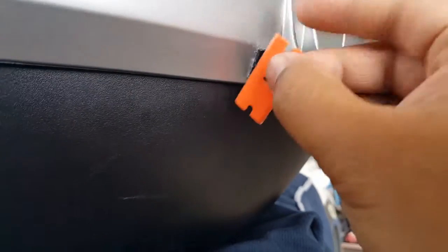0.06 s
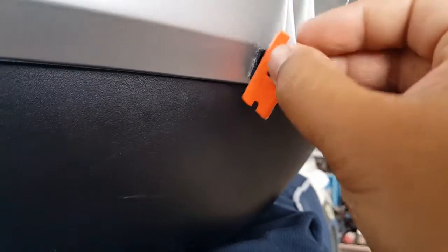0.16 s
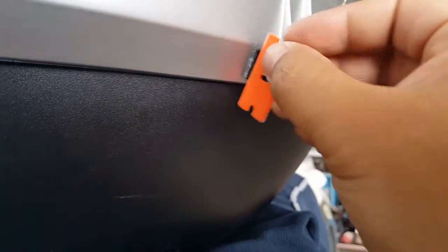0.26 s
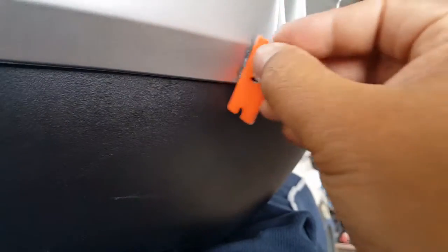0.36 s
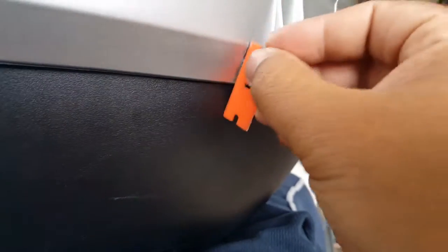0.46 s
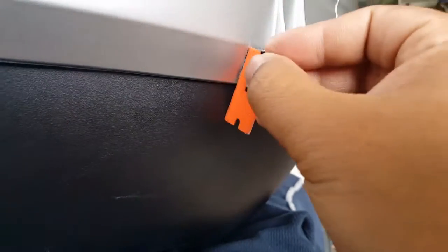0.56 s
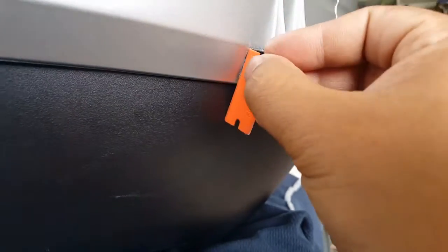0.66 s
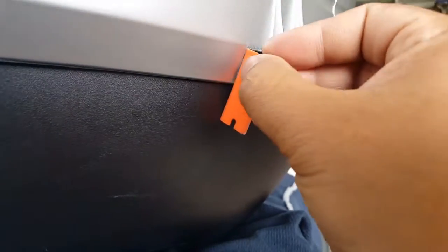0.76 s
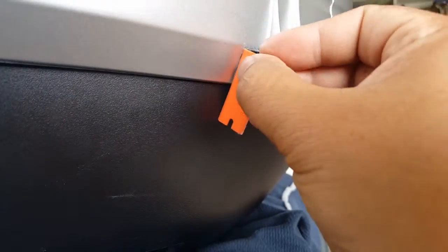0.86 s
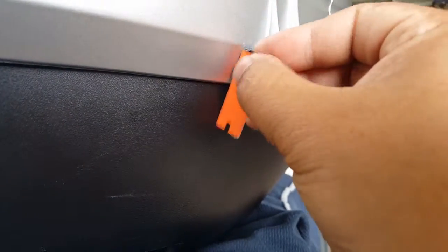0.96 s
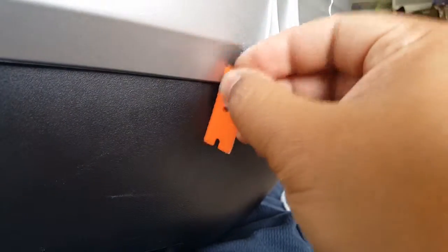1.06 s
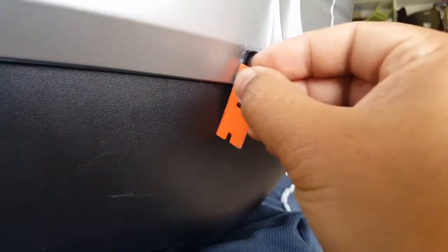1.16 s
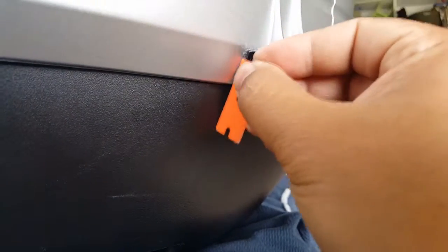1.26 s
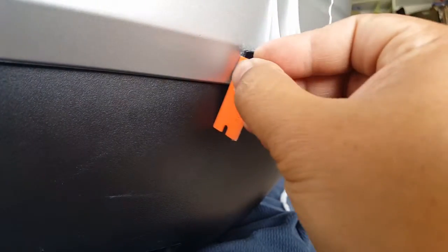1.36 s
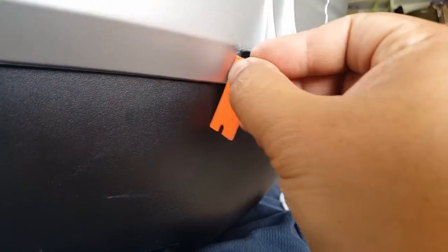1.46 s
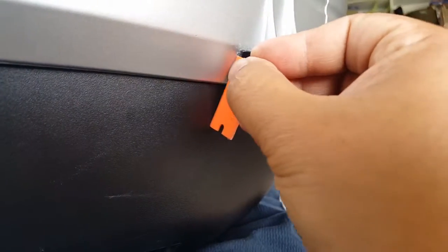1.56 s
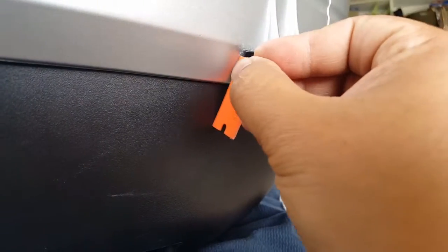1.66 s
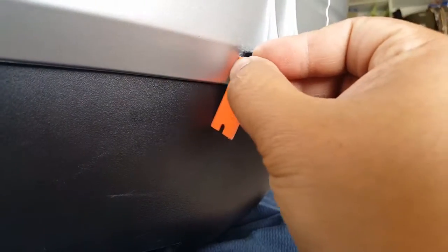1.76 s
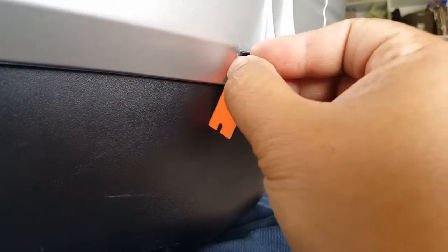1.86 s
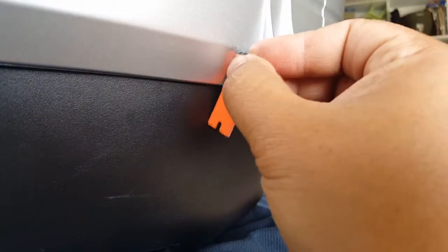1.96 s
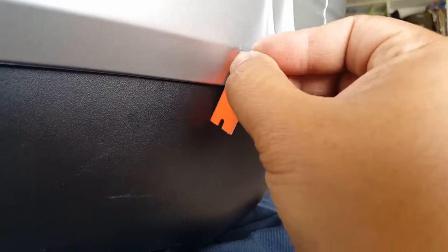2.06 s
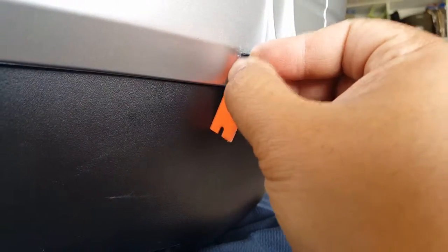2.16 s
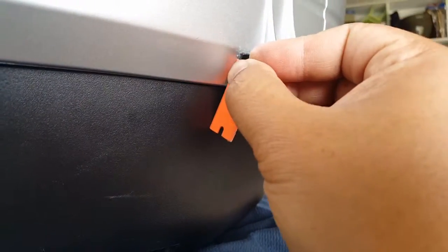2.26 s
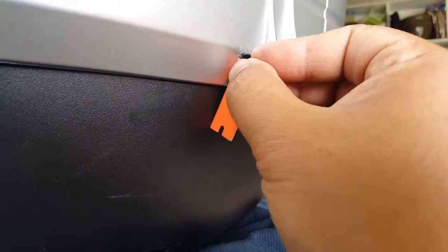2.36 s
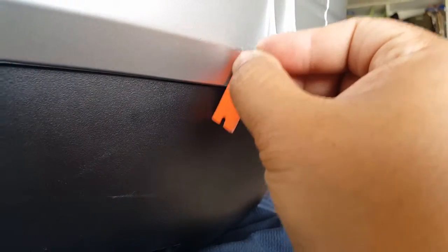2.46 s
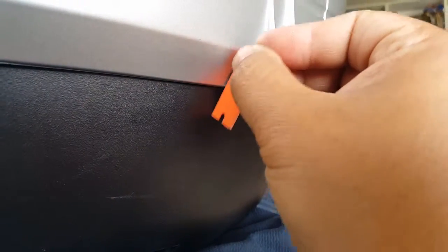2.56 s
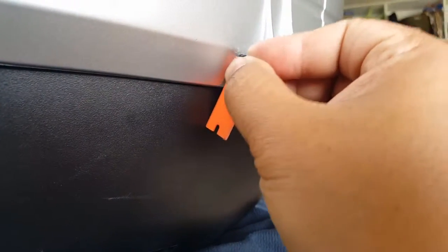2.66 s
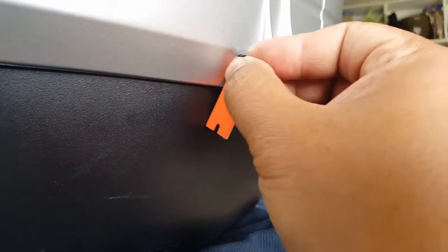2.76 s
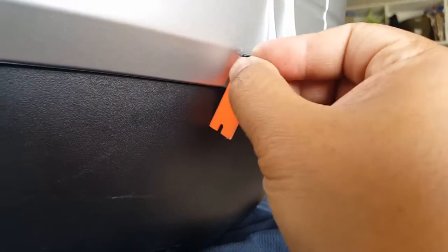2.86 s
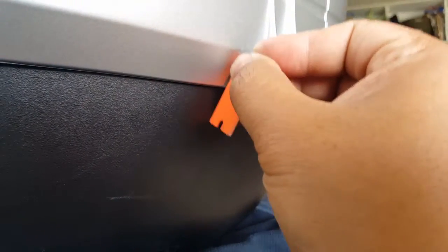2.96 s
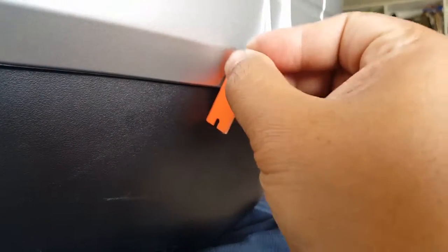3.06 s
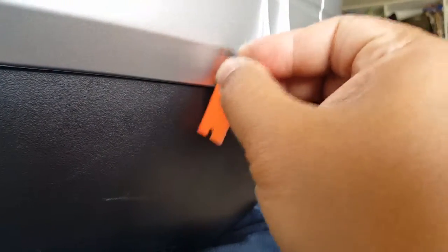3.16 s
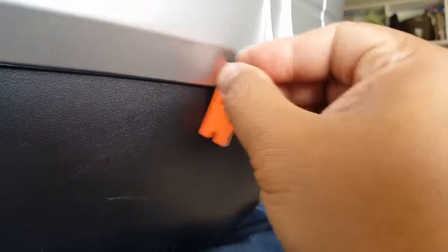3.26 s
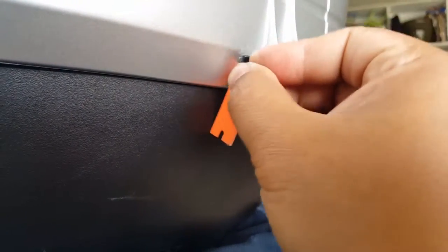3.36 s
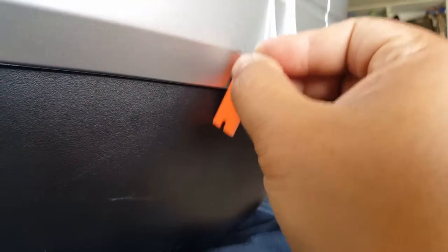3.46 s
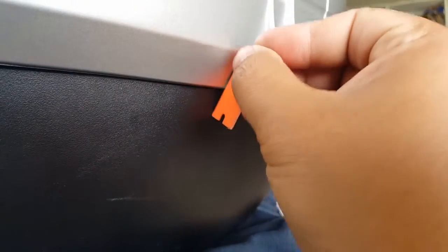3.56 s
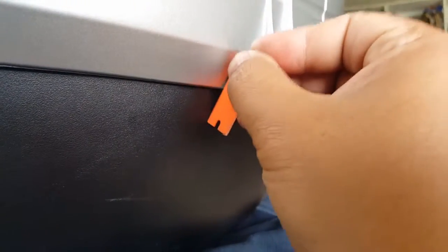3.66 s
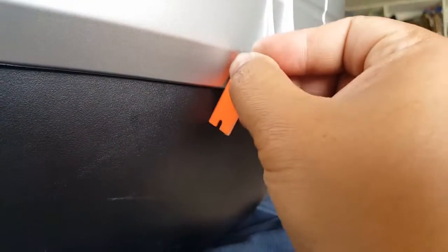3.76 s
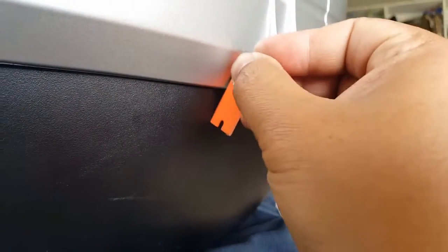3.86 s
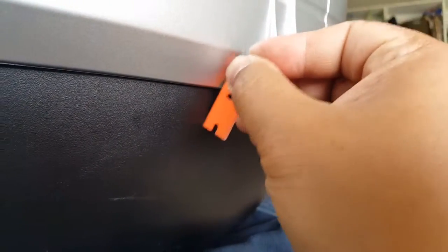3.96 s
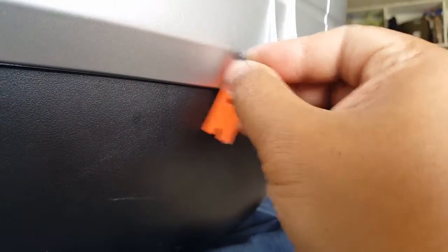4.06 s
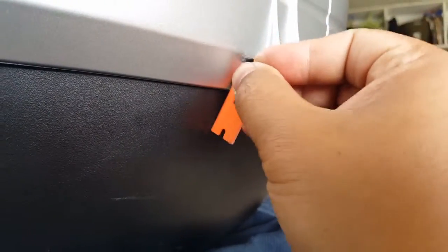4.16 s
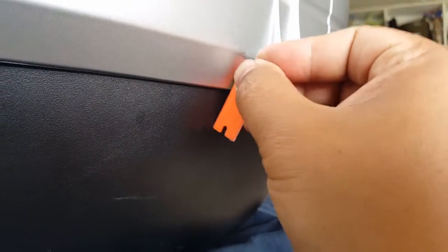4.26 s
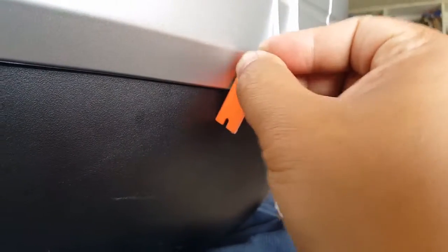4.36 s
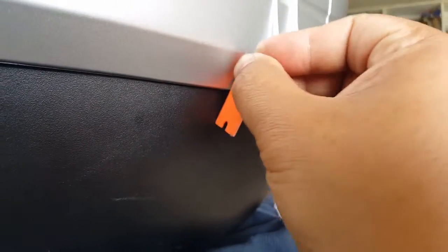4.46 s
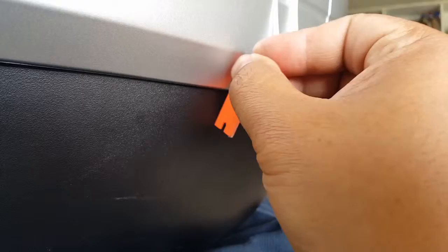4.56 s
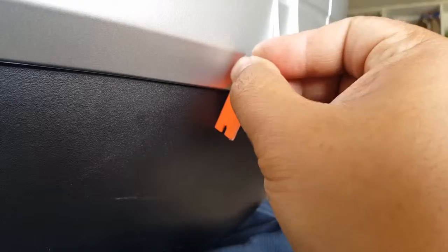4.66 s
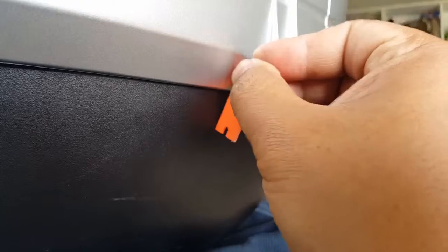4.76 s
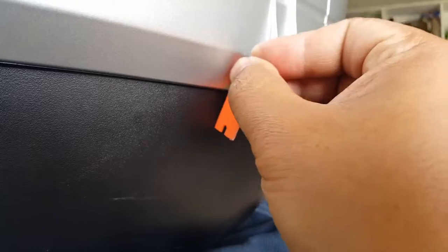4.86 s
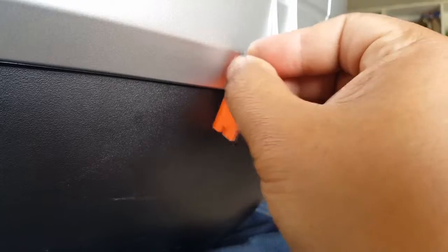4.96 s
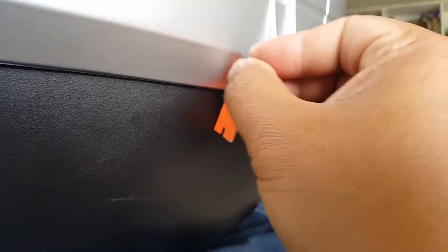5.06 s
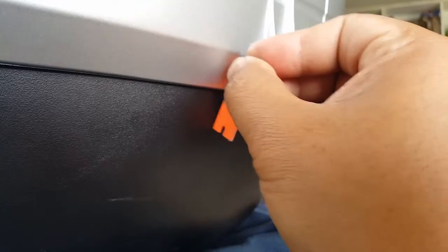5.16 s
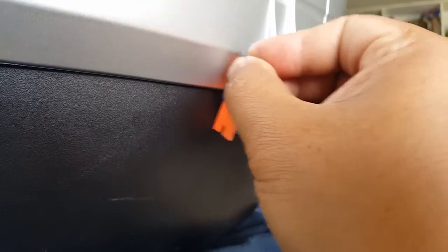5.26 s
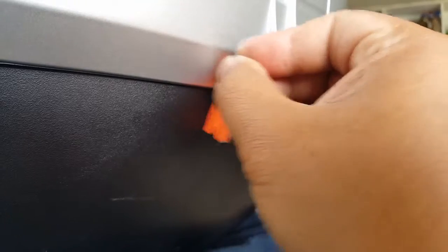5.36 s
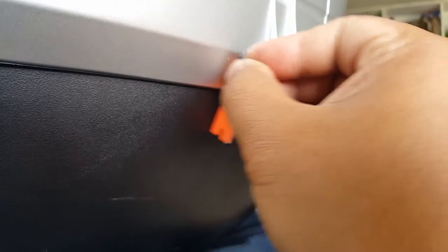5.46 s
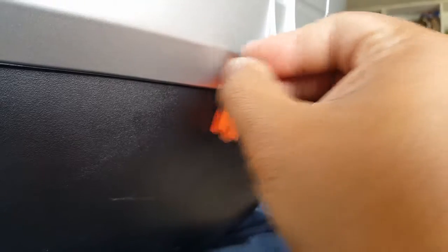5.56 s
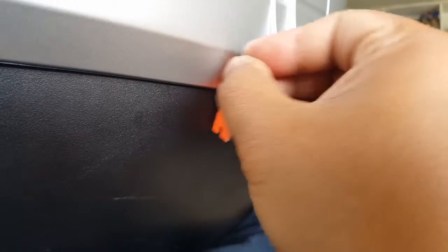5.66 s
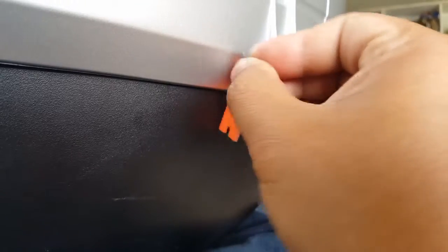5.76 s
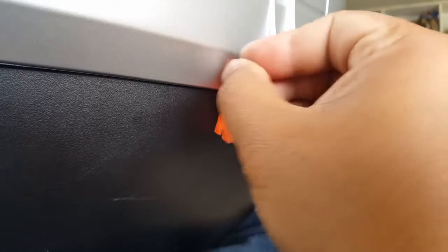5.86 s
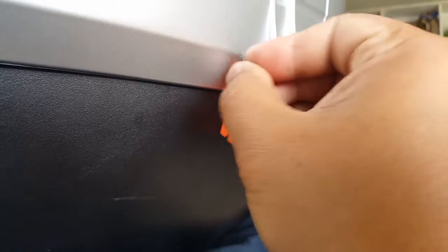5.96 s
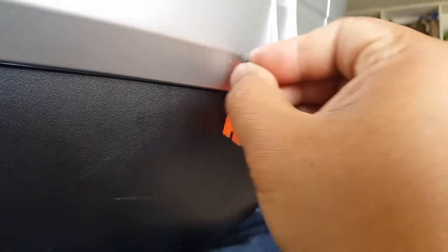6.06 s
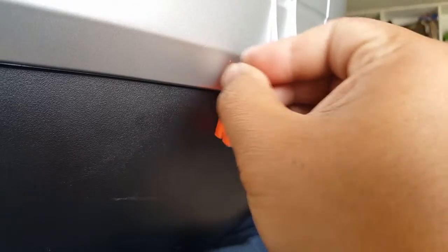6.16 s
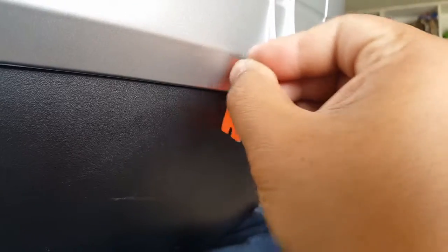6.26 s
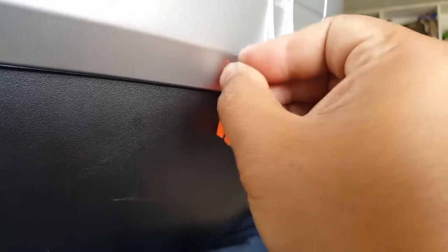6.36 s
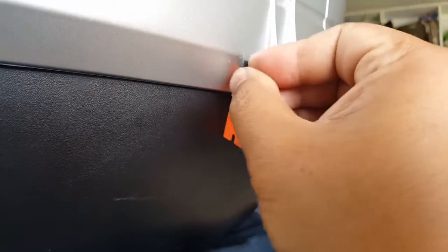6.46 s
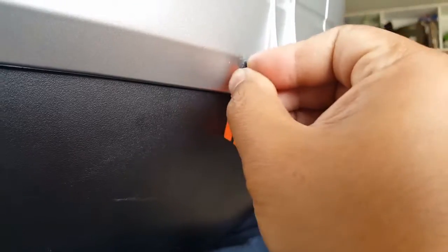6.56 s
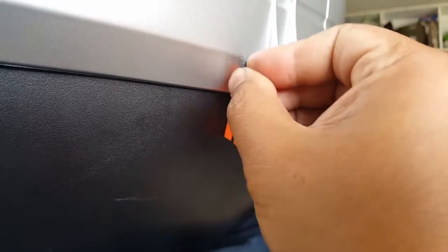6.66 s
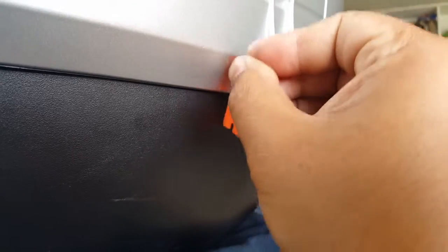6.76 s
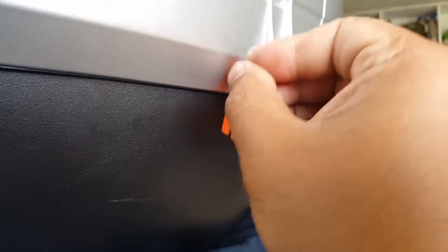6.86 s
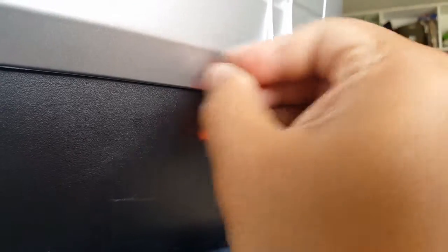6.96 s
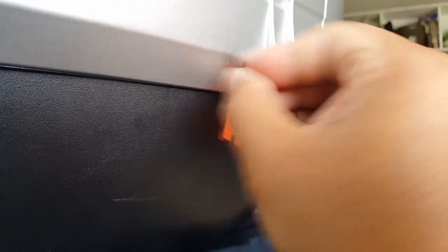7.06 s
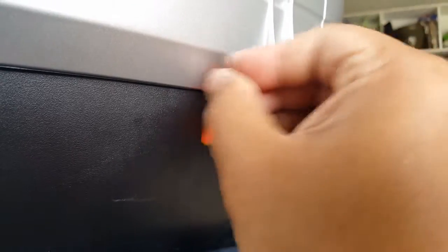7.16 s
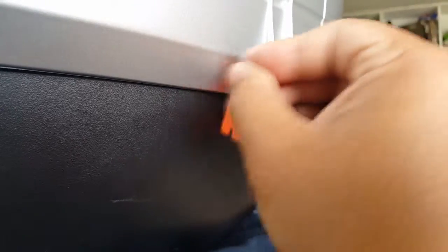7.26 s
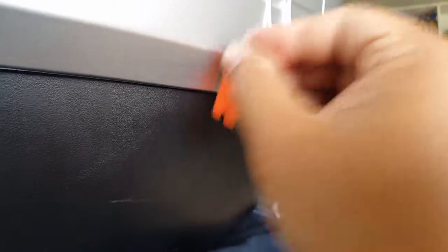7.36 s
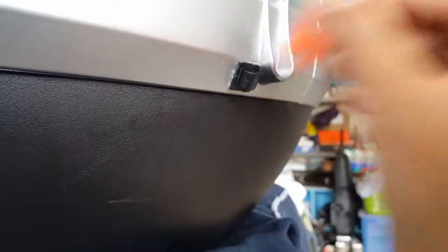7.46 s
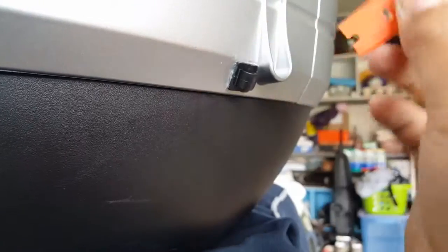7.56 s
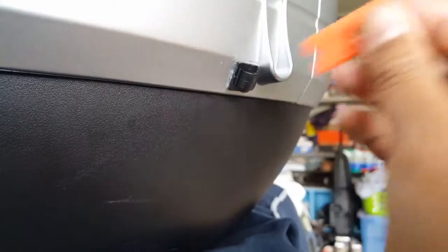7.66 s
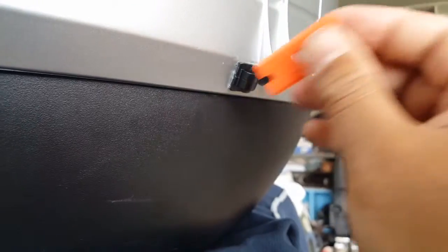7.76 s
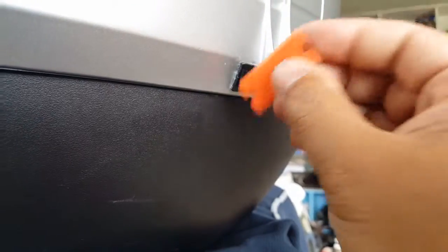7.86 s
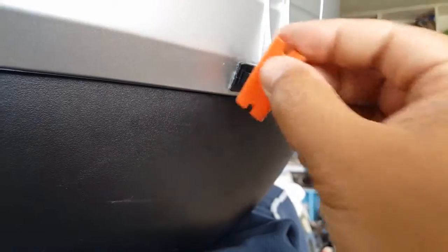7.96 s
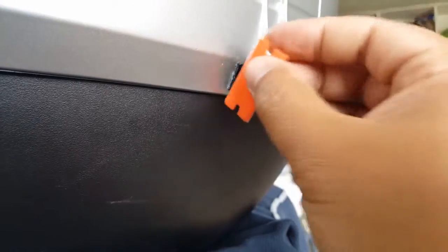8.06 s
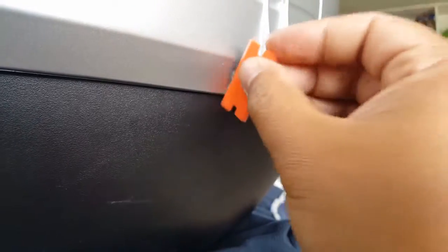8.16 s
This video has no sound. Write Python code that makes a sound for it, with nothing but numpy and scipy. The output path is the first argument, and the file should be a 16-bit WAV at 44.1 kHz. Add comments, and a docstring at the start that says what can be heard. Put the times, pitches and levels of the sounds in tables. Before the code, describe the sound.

Close dry scraping: a small plastic blade ticks and rasps on a hollow plastic case, quickening into loud hollow snaps, then soft finger bumps.

```python
"""In a quiet workshop, a small plastic scraper works dried glue off the edge of a hollow plastic case.
The blade drags, sticks and slips in short strokes and single snaps, close to the microphones.
Each slip is a tiny push sent through the ringing modes of the case; at some releases the panel rings on.
Shaped noise makes the soft rubs of blade and fingers, and short low pulses make the finger bumps.
A low drifting hum of sine waves and steady air noise lie underneath, and the room answers weakly."""
import sys
import numpy as np
from scipy import signal
from scipy.fft import rfft, irfft, next_fast_len
from scipy.io import wavfile
from scipy.ndimage import map_coordinates

SR = 44100
rng = np.random.default_rng(int(sys.argv[2]) if len(sys.argv) > 2 else 0)


def file_out(sig):
    """Save sig as 16-bit WAV at sys.argv[1]."""
    # one column per channel
    cols = np.atleast_2d(sig).T
    # limit, then scale
    lim = np.clip(cols, -1, 1)
    pcm = np.round(lim * 32767).astype(np.int16)
    wavfile.write(sys.argv[1], SR, pcm)


N = 361619

# Pushes of the blade. Each row: start in seconds, end in seconds, place of the hardest push (0-1),
# knock level in dB, then three levels relative to the knock: edge in dB, crispness in dB, thump in dB.
STROKES = [(1.12, 1.171, 0.73, -40, 1, -19.5, -7.5), (1.214, 1.261, 0.82, -39.5, 1, -13.5, -6),
           (1.38, 1.401, 0.2, -47.5, -14, -29, -1.5), (2.052, 2.061, 0.5, -40, -21, -35, -4),
           (2.081, 2.091, 0.77, -42, -8, -22, 0), (2.242, 2.281, 0.38, -46.5, -2.5, -18, -2),
           (3.379, 3.424, 0.56, -38, 1, -4.5, -6.5), (4.176, 4.207, 0.6, -37, 3.5, -7, -5),
           (4.988, 5.007, 0.7, -37, -2.5, -24, -2), (5.053, 5.093, 0.35, -40, -1.5, -20, 1.5),
           (5.365, 5.411, 0.32, -35.5, 2, -16, -7), (5.454, 5.493, 0.65, -29.5, 1, -12, -24),
           (5.565, 5.605, 0, -36, -1.5, -13, -6.5), (5.638, 5.665, 0.44, -33.5, 3.5, -19, -4.5),
           (5.668, 5.706, .6, -44, -1.5, -35, -5), (5.739, 5.771, 0.4, -37.5, -3.5, -14.5, -7),
           (5.808, 5.835, 0.64, -36, 0.5, -20, -8), (5.887, 5.934, 0.43, -45, -5.5, -29, 1),
           (5.963, 5.976, 0.6, -35, 0, -22, -2.5), (6.245, 6.27, 0, -31, 0, -11, -10),
           (6.311, 6.335, 0.86, -36, 1, -22, -19), (6.432, 6.452, 0.1, -39.5, 0, -18, -9),
           (6.486, 6.511, 0.75, -37.5, 6, -15, -10), (7.029, 7.09, 0.6, -31.5, -0.5, -10, -35),
           (7.116, 7.134, .8, -28, 0, -18.5, -26), (7.134, 7.173, 0.7, -27, 3.5, -13.5, -35),
           (7.225, 7.284, 0.41, -34, 0.5, -10, -27), (7.315, 7.367, 0.31, -33, 5.5, -14, -31),
           (7.412, 7.425, 0.06, -29.5, 0, -6.5, -0.5)]
# Single snaps of the blade. Each row: start in seconds, knock level in dB,
# then relative to the knock: edge in dB, crispness in dB.
SNAPS = [(0.41,-57.5,-2,-24), (0.543,-56.5,-5,-28), (0.585,-53,-21,-32), (0.869,-51.5,-21,-28.5),
         (1.123,-48,1,-17), (1.139,-43,8,-20), (1.166,-42,-7,-25), (1.179,-45,-8,-21), (1.239,-46,10,-17),
         (1.263,-48.5,4.5,-2), (1.309,-46,-3,-25), (1.471,-52.5,-16,-23), (1.508,-55,-19,-25),
         (1.595,-42,-12,-21.5), (1.804,-47,-16,-27), (1.918,-55,-12,-16), (2.2163,-47,-3,-11),
         (2.2563,-47,2,-15), (2.5036,-45,2.5,-14.5), (2.538,-43.5,-17,-28.5), (3.2247,-46.5,-9,-19),
         (3.238,-45,8,-8), (3.25,-42,6,-12), (3.2657,-39.5,6,-17), (3.275,-39,2,-18), (3.2889,-38,3,-14),
         (3.303,-44.5,1.5,-13), (3.376,-39.5,-4,-19), (3.399,-38,-2,-16), (3.4629,-41,4.5,-13),
         (4.0256,-41,-2,-27), (4.045,-40.5,5.5,-18), (4.0634,-39,4.5,-11), (4.092,-47,2,-27),
         (4.135,-41,-8,-31), (4.351,-45.5,-3.5,-24), (4.4918,-45,-4.5,-36), (4.672,-46,-1,-19),
         (4.6943,-47,1,-23), (4.755,-50,-4,-29), (4.814,-47,-21,-29), (4.8261,-42,8.5,-5),
         (4.8438,-43.5,6.5,-6), (4.9482,-47,-6,-17), (5.0009,-41.5,5.5,-9), (5.0053,-33.5,1,-14),
         (5.011,-34.5,6,-8.5), (5.024,-38,-18,-38), (5.058,-39.5,4.5,-18), (5.064,-39,6,-13),
         (5.149,-49.5,-6,-23), (5.182,-40.5,0.5,-8), (5.2546,-42,0,-26), (5.323,-53.5,-5,-30),
         (5.371,-42,-4,-9), (5.3797,-43,4,0.5), (5.4015,-42,10,4), (5.4082,-39,7,-11),
         (5.4193,-37.5,1.5,-16), (5.448,-35,0,-17), (5.4596,-39,9,-4), (5.473,-35.5,8,-9),
         (5.527,-54,6,-13), (5.556,-39,3.5,-8.5), (5.648,-42.5,13,0), (5.7226,-46,1,-27),
         (5.8142,-35.5,6,-16), (5.827,-36.5,1.5,-17), (5.852,-53,7,-19), (5.9223,-46,-3,-25.5),
         (6.037,-49.5,-3.5,-28.5), (6.0765,-43.5,-14,-29), (6.085,-47,2,-21), (6.129,-33.5,-5,-32),
         (6.134,-39.5,-9.5,-27), (6.2275,-46,-10,-25), (6.237,-37,-6,-21), (6.3896,-48,7,-32),
         (6.4326,-43,-1,-26), (6.4954,-37,9.5,-9.5), (6.816,-48,-1,-19), (6.8627,-45,1,-29),
         (6.8772,-23.5,3.5,-13.5), (7.0211,-33,-21,-44), (7.0299,-37,4,-6), (7.0764,-39.5,5,-3),
         (7.14,-36,9.5,-3), (7.1473,-36,11,-7), (7.2315,-31.5,-2,-23), (7.2404,-36.5,11,-3.5),
         (7.2465,-46,5,-3), (7.2803,-40.5,7.5,-2), (7.3178,-35,0.5,-22), (7.4065,-33,-4,-24),
         (7.413,-33.5,4,-11), (7.4308,-43,4,-1)]
# The panel springs back as the blade lets go, ringing the modes near one pitch.
# Each row: start in seconds, peak level in dB, pitch in Hz.
PANEL_KNOCKS = [(1.156, -32, 255), (1.241, -38, 255), (1.272, -34, 380), (2.503, -36.5, 776),
                (4.184, -37.5, 145), (4.992, -31.5, 377), (5.002, -35, 292), (5.019, -39, 145),
                (5.081, -38, 145), (5.459, -26, 380), (5.487, -27, 145), (5.562, -28, 776),
                (5.574, -28, 380), (5.671, -36, 145), (5.82, -30, 341), (6.131, -51, 303),
                (6.265, -27, 380), (6.322, -32, 380), (6.879, -18, 776), (7.073, -26, 577),
                (7.113, -23.5, 633), (7.174, -33, 145), (7.411, -23.5, 310), (7.44, -39, 380)]
# Ringing modes of the case. Each row: frequency in Hz, width in Hz, level in dB, left over right in dB.
CASE_MODES = [(140, 29.4, 12, 7), (255, 280, -6, -1.5), (312, 87, 2, 2), (386.7, 36.6, 6.5, 5.5),
              (577, 52, 3.5, 3.5), (679, 48, -30, 17), (776, 52, -3.5, 26), (1028, 59, 5, 6.5),
              (1199, 63, -2.5, 7), (1398, 54, 3, 0.5), (1560, 15, -16, 7), (1755, 53, 10, 7),
              (2240, 60, 10, 0.5), (2693, 59, -1.5, 7), (3020, 135, -5, 8), (3430, 23, -6.5, 5.5),
              (4330, 370, -24.5, 13), (4936, 150, -19.5, 2), (8540, 120, -31, 14)]
# Colour of the panel's crowd of short-lived modes. Each row: frequency in Hz, level in dB.
PANEL_COLOUR = [(60, -17), (140, 2.5), (330, -4), (470, -12), (650, 3), (1300, -2), (2300, 1.5), (2950, 2),
                (3700, -17), (4800, -16), (6500, -20), (8600, -15), (9800, -33), (12300, -27),
                (15500, -40.5)]
# How long that crowd takes to fall by 60 dB. Each row: frequency in Hz, time in seconds.
PANEL_T60 = [(150, 0.23), (800, 0.052), (2500, 0.032), (5000, 0.034), (12000, 0.037)]
# How far the left microphone leads the right. Each row: frequency in Hz, phase in radians.
LEFT_LEAD = [(100, .1), (300, .3), (450, 1.2), (950, 1.0), (1450, 3.1), (2200, 2.2), (3000, 3.1),
             (4300, 4.0), (8000, 7.2), (15000, 12.0)]
# How much louder the panel is on the left. Each row: frequency in Hz, left over right in dB.
LEFT_LOUDER = [(100, 10), (400, 2.5), (750, 10), (1400, -2), (2300, 13.5), (4400, 11), (8000, 12),
               (15000, 7)]
# Soft rubs of blade and fingertips, before panning.
# Each row: middle in seconds, half length in seconds, level in dB, hiss relative to it in dB.
RUBS = [(.5, 0.47, -61, -14.5), (.49, 0.035, -66.5, -32), (.59, 0.02, -68, -19), (.75, 0.046, -69, -22),
        (1.08, 0.019, -59, -22), (1.24, 0.091, -51, -20), (2.43, 0.032, -79, -25), (2.15, 0.028, -63, -26),
        (2.57, 0.052, -50, -26), (2.742, 0.031, -49, -12), (2.883, 0.071, -60.5, -13),
        (3.064, 0.015, -51, -31), (3.57, 0.041, -46.5, -23), (3.77, 0.024, -58, -33),
        (4.117, 0.11, -50.5, -23), (4.42, 0.05, -55, -37), (5.75, 0.025, -47.5, -35),
        (5.86, .012, -71, -21), (5.95, 0.1, -52, -24), (6.17, 0.02, -57, -22), (6.37, 0.057, -54, -16.5),
        (6.47, 0.014, -50, -34), (6.56, 0.022, -55, -22), (6.87, 0.088, -52.5, -34),
        (7.927, 0.084, -62, -12)]
# Colour of the dull rubbing. Each row: frequency in Hz, level in dB.
RUB_COLOUR = [(100, 7), (350, 11.5), (900, 8.5), (1600, -3), (2400, -15), (4000, -17.5), (12000, -94)]
# Shifts of the grip, before panning. Each row: middle in seconds, half length in seconds, rumble in dB.
GRIP_SHIFTS = [(6.254, 0.045, -45), (7.884, 0.048, -48.5), (8.103, 0.09, -40)]
# Colour of the grip's rumble. Each row: frequency in Hz, level in dB.
HANDLING_COLOUR = [(15, -24), (40, 6), (100, 8.5), (200, 7.5), (400, -10), (800, -48), (2000, -72.5)]
# Finger bumps, before filtering and panning. Each row: start in seconds, peak level in dB.
BUMPS = [(6.203, -36), (6.229, -42), (6.254, -29), (6.282, -37), (6.312, -43), (7.708, -62), (7.757, -34),
         (7.812, -34.5), (7.877, -41), (7.911, -34), (7.943, -34.5), (7.982, -34), (7.997, -33),
         (8.03, -28), (8.051, -33), (8.066, -31), (8.092, -22.5), (8.126, -26), (8.152, -26), (8.184, -32)]
# Colour of the air noise. Each row: frequency in Hz, level in dB.
AIR_COLOUR = [(20, -28), (45, -27), (78, -2), (150, -1), (200, -4), (280, -8.5), (450, -15.5),
              (1000, -19.5), (2000, -27), (4000, -34.5), (8000, -40), (10500, -44.5), (13000, -39),
              (15500, -46)]
# Lines of the hum. Each row: ratio to the hum's base pitch, relative level in dB.
HUM_LINES = [(0.533, -5.5), (0.83, -6.5), (0.999, 1), (1.345, -9), (1.619, -6.5), (2, -13.5)]
# Slow drift of the hum's base pitch. Each row: time in seconds, pitch in Hz.
HUM_PITCH = [(0, 101.5), (.8, 100.4), (1.4, 98.3), (1.8, 94.9), (2.2, 94.7), (2.5, 98.2), (3.3, 97.5),
             (4.5, 100.6), (5.8, 103.3), (8.2, 98.5)]
# How long the room's echo takes to fall by 60 dB. Each row: frequency in Hz, time in seconds.
ROOM_T60 = [(150, 0.57), (1000, 0.13), (4000, 0.25), (12000, 0.11)]

SIZE = 16384  # samples in one contact sound
HZ = np.fft.rfftfreq(SIZE, 1 / SR)
TIME = np.arange(N) / SR
TOP_HZ = 15100  # nothing is kept above this
THUMP_HZ, EDGE_HZ, CRISP_HZ = 250, 1200, 4000  # borders between thump, knock, edge and crispness
SLIP_HZ, SLIP_DOUBLING_DB = 184.6, 20  # slips a second at 0 dB of edge; this much more edge doubles it
SNAP_THUMP_DB = -10.5  # relative to the snap's knock
CRACK_TOP_HZ, CRACK_OCTAVE_DB = 19300, 25  # the top falls an octave with this much less crispness
KNOCK_SPREAD_OCT, KNOCK_RISE_S = 0.14, 0.0032
# The fingers rub along with each stroke: level below it, half length over its length, hiss over the rub.
DRAG_DB, DRAG_SPREAD, DRAG_HISS_DB = -19.5, 0.65, -10
# A bump knocks the case dully: knock relative to the bump, then the rest relative to that knock.
BUMP_KNOCK_DB, BUMP_EDGE_DB, BUMP_CRISP_DB, BUMP_THUMP_DB = -26, -20, -47, 4
HUM_DB, HUM_FADE_DB_PER_S = -53.5, 0.86  # level at the start; the hum slowly fades
HUM_SWELL_S, HUM_SWELL_HALF_S, HUM_SWELL_DB = 2.77, 0.11, 5.5  # and swells once
# A higher line comes and goes: ratio to the base pitch, middle, half length, relative level.
HUM_GUEST_RATIO, HUM_GUEST_S, HUM_GUEST_HALF_S, HUM_GUEST_DB = 1.36, 2.3, .55, -3


def strokes(uneven=.36, size_db=1.7, ends_db=-8.0, grit_db=-5, grit_life=0.00094, crumb_rate=2500,
            drag_db=-6, drag_hz=1200, drag_ends_db=0.5, run_up=.009, crackle_db=-11,
            crackle_hz=1800, crackle_spread_oct=0.71, bite=0.23):
    """The blade drags, sticks and slips unevenly; slips crumble glue, most where the push is hardest."""
    track = np.zeros((2, N))
    t = np.arange(SIZE) / SR
    crumble = np.exp(-t / grit_life)
    for start, end, hardest, db, edge_db, crisp_db, thump_db in STROKES:
        length = max(end - start, .005)
        rate = SLIP_HZ * 2 ** (edge_db / SLIP_DOUBLING_DB)
        # slack is how far the push is from its hardest
        peak_s = length * np.clip(hardest, .1, .9)
        knots = run_up + np.array([-run_up, 0, peak_s, length, length + run_up])
        slack = np.interp(t, knots, [0, 1, 0.078, 0.8, 3.9])
        push = amp(ends_db * slack)

        # each slip has its own wait, size and tip pitch; at least one slip is kept
        gaps, sizes, tips = np.clip(rng.standard_normal((3, 40)), -2, 2)
        waits = np.exp(uneven * gaps) / rate
        times = np.cumsum(waits) - waits[0] / 2
        keep = (times < length) | (times == times[0])
        at = ((run_up + times[keep]) * SR).astype(int)
        slips = push * np.bincount(at, amp(size_db * sizes)[keep], SIZE)

        crumbs = rng.standard_normal(SIZE) * (rng.random(SIZE) < crumb_rate / SR)
        crumbling = signal.fftconvolve(slips, crumble)[:SIZE]
        grit = amp(grit_db) * unit(crumbling * crumbs)

        pitches = crackle_hz * 2 ** (crackle_spread_oct * tips[keep])
        crackle = amp(crackle_db) * crackles(at / SR, slips[at], pitches)

        # soft glue yields without a crack
        scrape = band(rng.standard_normal(SIZE), drag_hz, "low", order=2)
        drag = unit(amp(drag_ends_db * slack) * (t < knots[-1]) * scrape)
        drag = amp(drag_db) * drag * np.sqrt(2 * drag_hz / SR)

        force = unit(slips) + grit + crackle + drag
        crack = (unit(slips) + grit) * push ** bite
        slide = np.clip((t - run_up) / length, 0, 1)
        sound = contact(force, crack, length, db, edge_db, crisp_db, thump_db, slide)
        add(track, start - run_up, sound)
    return track


def crackles(times, sizes, pitches, cycles=1.18):
    """Every slip rings the blade's tip for a few cycles, at a pitch of its own."""
    t = np.maximum(TIME[:SIZE // 2] - times[:, None], 0)
    turns = t * pitches[:, None]
    strength = (sizes * np.sqrt(pitches))[:, None]
    rings = strength * np.sin(2 * np.pi * turns) * np.exp(-turns / cycles)
    return unit(np.pad(rings.sum(axis=0), (0, SIZE // 2)))


def snaps(length=0.011):
    """The blade lets go once, a single blow to the case, with a dull tick or a crisp crack."""
    track = np.zeros((2, N))
    blow = np.ones(1)
    for s, db, edge_db, crisp_db in SNAPS:
        add(track, s, contact(blow, blow, length, db, edge_db, crisp_db, SNAP_THUMP_DB))
    return track


def contact(force, crack, length, db, edge_db, crisp_db, thump_db, slide=0):
    """Force through the case: a hard blade adds edge, cracking glue crispness, a heavy hand thump."""
    # the answer changes as the blade slides from one place (0) to another (1)
    places = [(np.cos(slide * np.pi / 2), case_response())]
    if np.any(slide):
        places.append((np.sin(slide * np.pi / 2), case_response()))

    def through_case(x):
        """Each place on the case answers its share of the force, and the end is faded."""
        spectrum = sum(rfft(x * share, SIZE) * response for share, response in places)
        return irfft(spectrum) * np.linspace(1, 0, SIZE)

    sound = through_case(force)
    cracks = through_case(crack)
    thump = band(sound, [125, THUMP_HZ], "band", order=2)
    knock = band(band(sound, EDGE_HZ, "low"), THUMP_HZ, "high", order=2)
    edge = band(sound, [EDGE_HZ, CRISP_HZ], "band")
    top_hz = np.clip(CRACK_TOP_HZ * 2 ** (crisp_db / CRACK_OCTAVE_DB), CRISP_HZ, TOP_HZ)
    crisp = band(band(cracks, CRISP_HZ, "high"), top_hz, "low", order=1)
    # the thump is turned over, as the filters put it out of phase with the knock where they meet
    mix = unit(knock) - amp(thump_db) * unit(thump)
    mix = mix + amp(edge_db) * unit(edge) + amp(crisp_db) * unit(crisp)
    # the energy of that level held for the contact's length
    return amp(db) * mix * np.sqrt(length * SR / SIZE)


def case_response(crack_db=-4, crowd_db=-2, modes_db=3, scatter_db=2):
    """The case's answer to a push; mode strengths and pitches vary with where the blade presses."""
    modes = 0
    for k, (f, w, db, left) in enumerate(CASE_MODES):
        f = f * np.exp(.016 * rng.standard_normal())
        strength = amp(db + scatter_db * rng.standard_normal()) * (-1) ** k * pan(left)
        resonance = 1j * HZ * w / (f * f - HZ ** 2 + 1j * HZ * w)
        modes = modes + strength * resonance / (1 + .5j * HZ / f)

    # causal colour: folding the cepstrum gives a sharp front
    cepstrum = irfft(np.log(amp(along(PANEL_COLOUR, HZ))))
    cepstrum[1:SIZE // 2] *= 2
    cepstrum[SIZE // 2 + 1:] = 0
    panel = np.exp(rfft(cepstrum)) * pan(along(LEFT_LOUDER, HZ))

    # long waves reach both microphones alike
    crowd = rfft(tail(PANEL_T60, size=64))
    apart = along([(300, 0.34), (1200, 2.06)], HZ)
    crowd[1] = np.cos(apart) * crowd[0] + np.sin(apart) * crowd[1]

    lag = np.exp(-1j * np.outer([0, 1], along(LEFT_LEAD, HZ)))  # the right microphone is farther off
    return lag * (panel * (amp(crack_db) + amp(crowd_db) * crowd) + amp(modes_db) * modes)


def knocks(damping=0.71):
    """The released panel rings on; where it was pressed decides which of its modes answer."""
    track = np.zeros((2, N))
    t = TIME[:SIZE // 2]
    hz, width, _, left = np.transpose(CASE_MODES)
    lag = np.outer([0, 1], along(LEFT_LEAD, hz))[:, :, None]
    phase = 2 * np.pi * hz[:, None] * t - lag
    decay = np.exp(-np.pi * damping * width[:, None] * t)
    rise = 1 - np.exp(-t / KNOCK_RISE_S)
    modes = pan(left)[:, :, None] * np.sin(phase) * decay * rise
    for s, db, pitch in PANEL_KNOCKS:
        octaves_off = np.log2(hz / pitch)
        ring = np.exp(-(octaves_off / KNOCK_SPREAD_OCT) ** 2) @ modes
        add(track, s, amp(db) * ring / np.abs(ring).max())
    return track


def rubs(grain_db=1.5, pressure_db=4.5, speck_rate=110, speck_db=-6):
    """Light sliding: a dull grainy swell, a little hiss, and specks of glue that tick in the case."""
    rows = list(RUBS)
    for start, end, _, db, *_ in STROKES:
        rows.append(((start + end) / 2, DRAG_SPREAD * (end - start), db + DRAG_DB, DRAG_HISS_DB))
    swells = [amp(db) * swell(s, half) for s, half, db, _ in rows]
    hiss = sum(level * amp(row[3]) for level, row in zip(swells, rows))

    grain = unit(amp(grain_db * wobble(180) + pressure_db * wobble(25)))
    dull = noise(RUB_COLOUR, width=0.42) * grain

    specks = (rng.random(N) < speck_rate / SR) * np.sign(rng.standard_normal(N)) * rng.random(N)
    answer = irfft(case_response())[:, :SIZE // 2]
    ticks = unit(signal.fftconvolve(specks[None], answer, axes=1)[:, :N])

    hiss_colour = [(1000, 2), (4000, 19.0), (8500, 12.0), (10500, 6.5), (15000, -8.5)]  # Hz, dB
    bright = hiss * noise(hiss_colour, width=1)
    return (sum(swells) * (dull + amp(speck_db) * ticks) + bright) * pan(1.3)


def handling(bump_hz=105, bump_life=0.0029, pad_s=0.002, length=0.014):
    """The shifting grip rumbles and bumps, mostly on the left; soft fingertips knock the case."""
    grip = sum(amp(db) * swell(s, half) for s, half, db in GRIP_SHIFTS)
    track = grip * unit(amp(2.4 * wobble(34))) * noise(HANDLING_COLOUR, width=0.61)
    t = np.arange(SIZE) / SR
    push = np.sin(2 * np.pi * bump_hz * t) * np.exp(-t / bump_life)
    pad = np.sin(np.pi * np.minimum(t / pad_s, 1)) ** 2
    for s, db in BUMPS:
        knock = contact(pad, pad, length, db + BUMP_KNOCK_DB, BUMP_EDGE_DB, BUMP_CRISP_DB, BUMP_THUMP_DB)
        add(track, s, amp(db) * push / push.max() + knock)
    return band(track, 40, "high", order=2) * pan(26)


def workshop(air_db=-58, waver_db=3.0, drift=0.29):
    """A low hum whose lines drift slowly together, over steady air noise."""
    phase = 2 * np.pi * np.cumsum(np.interp(TIME, *np.transpose(HUM_PITCH))) / SR
    hum = 0
    for ratio, db in HUM_LINES:
        level = amp(db + waver_db * wobble(6.1))
        hum = hum + level * np.sin(ratio * phase + drift * wobble(5.6))
    guest_level = amp(HUM_GUEST_DB + waver_db * wobble(6.14)) * swell(HUM_GUEST_S, HUM_GUEST_HALF_S)
    hum = hum + guest_level * np.sin(HUM_GUEST_RATIO * phase + drift * wobble(10.0))
    hum_db = HUM_DB - HUM_FADE_DB_PER_S * TIME + HUM_SWELL_DB * swell(HUM_SWELL_S, HUM_SWELL_HALF_S)
    return (amp(air_db) * noise(AIR_COLOUR, width=0.17) + amp(hum_db) * hum) * pan(0.7)


def amp(db):
    """Decibels to gain."""
    return 10 ** (np.asarray(db) / 20)


def unit(x):
    """Scale to rms 1."""
    return x / np.sqrt(np.mean(x ** 2) + 1e-20)


def along(points, hz):
    """Read (Hz, value) points on a log frequency axis."""
    f, v = np.transpose(points)
    return np.interp(np.log(hz + 1), np.log(f + 1), v)


def pan(db):
    """Left and right gains of mean power 1, from left over right in dB."""
    gains = amp(np.array([np.atleast_1d(db), -np.atleast_1d(db)]) / 2)
    return gains / np.sqrt(np.mean(gains ** 2, axis=0))


def band(x, hz, kind, order=4):
    """Butterworth filter that runs forward in time."""
    return signal.sosfilt(signal.butter(order, hz, kind, fs=SR, output="sos"), x)


def add(track, s, sound):
    """Mix a sound in at a time in seconds."""
    part = track[:, max(0, round(s * SR)):][:, :sound.shape[-1]]
    part += sound[..., :part.shape[1]]


def swell(s, half):
    """A bell-shaped rise and fall, top 1."""
    return np.exp(-((TIME - s) / half) ** 2 / 2)


def wobble(rate):
    """A smooth random curve, with rate knots a second."""
    return map_coordinates(rng.standard_normal(int(N * rate / SR) + 4), [TIME * rate])


def noise(colour, width):
    """Coloured stereo noise of rms 1; width is the side share in the bass, the treble is diffuse."""
    size = next_fast_len(N + SIZE)
    hz = np.fft.rfftfreq(size, 1 / SR)
    spread = along([(150, width), (1200, 1.0)], hz)
    spectrum = rfft(rng.standard_normal((2, size))) * amp(along(colour, hz))
    spectrum[1] *= spread
    mid, side = irfft(spectrum, size)[:, :N]
    return unit(np.array([mid + side, mid - side]))


def tail(t60, size):
    """Stereo noise of energy 1 in which each frequency dies at its own speed."""
    hz, t, z = signal.stft(rng.standard_normal((2, SIZE)), SR, nperseg=size)
    decay = amp(-60 * t / along(t60, hz)[:, None])
    ring = signal.istft(z * decay, SR, nperseg=size)[1][:, :SIZE]
    return unit(ring) / np.sqrt(SIZE)


def scene(room_db=-21):
    """The scraper close by, with a weak, slightly later answer from the room."""
    blade = strokes() + snaps() + knocks()
    room = np.pad(tail(ROOM_T60, size=256), ((0, 0), (SR // 150, 0)))
    echo = signal.fftconvolve(blade, room, axes=1)[:, :N]
    echo = amp(room_db) * band(echo, 9400, "low", order=1)
    return blade + echo + rubs() + handling() + workshop()


def record(dry):
    """Nothing is kept above the band limit."""
    size = next_fast_len(N + SIZE)
    kept = np.fft.rfftfreq(size, 1 / SR) < TOP_HZ
    return irfft(rfft(dry, size) * kept, size)[:, :N]


dry = scene()
out = record(dry)
file_out(out)
```